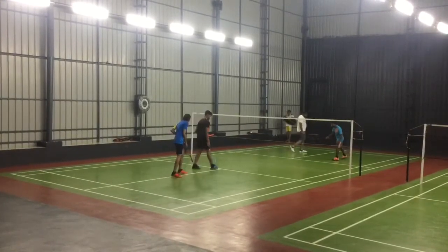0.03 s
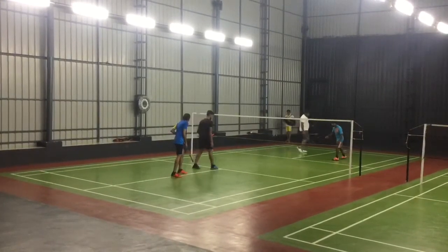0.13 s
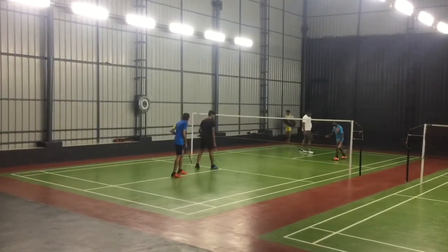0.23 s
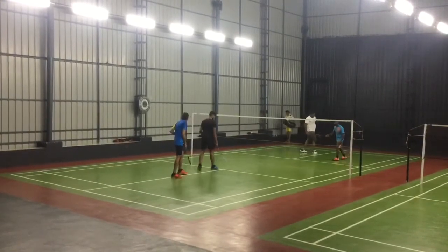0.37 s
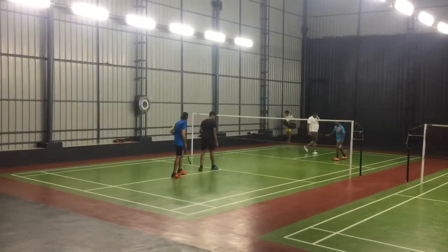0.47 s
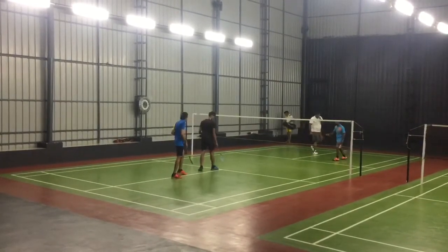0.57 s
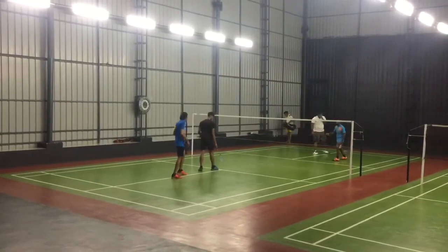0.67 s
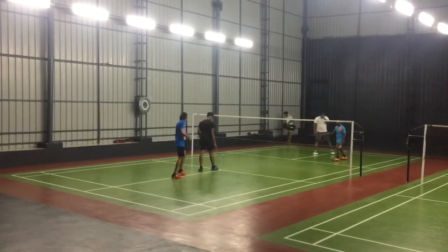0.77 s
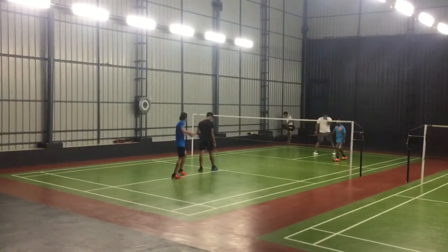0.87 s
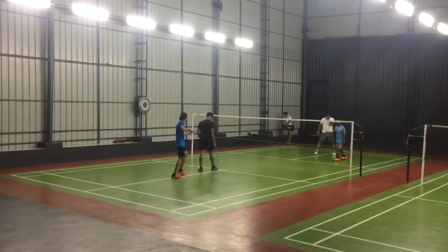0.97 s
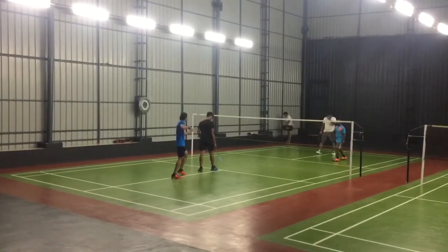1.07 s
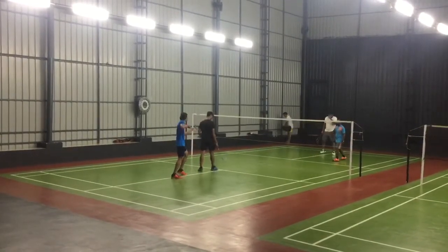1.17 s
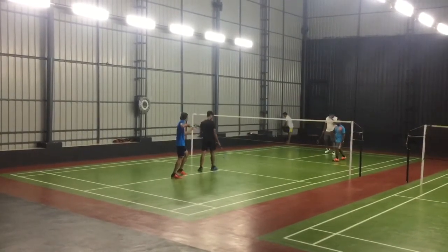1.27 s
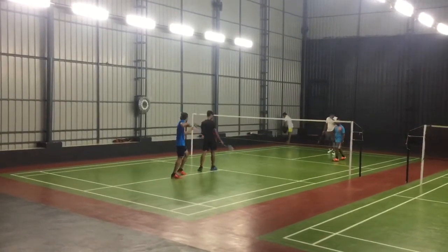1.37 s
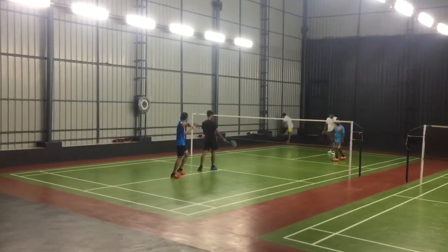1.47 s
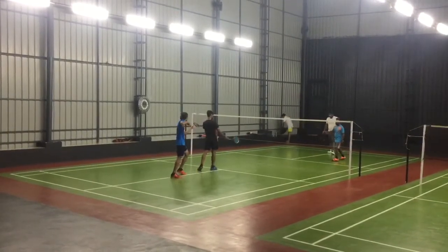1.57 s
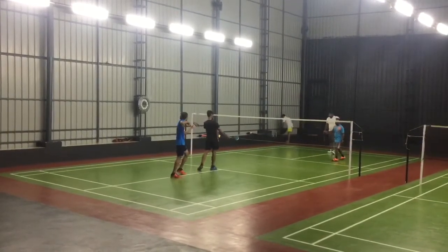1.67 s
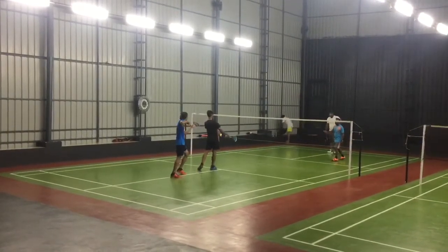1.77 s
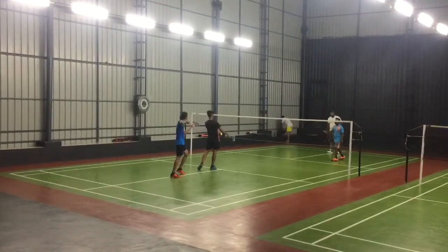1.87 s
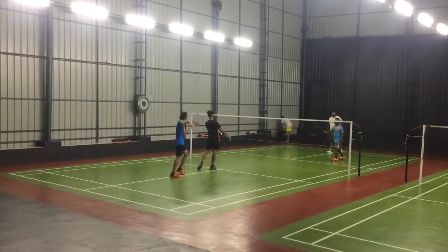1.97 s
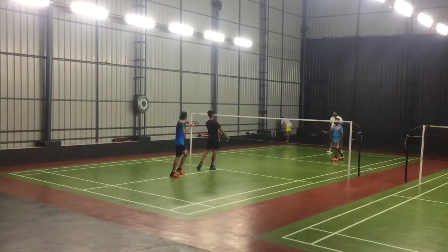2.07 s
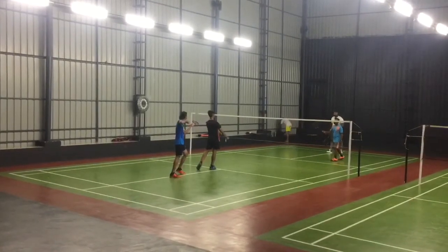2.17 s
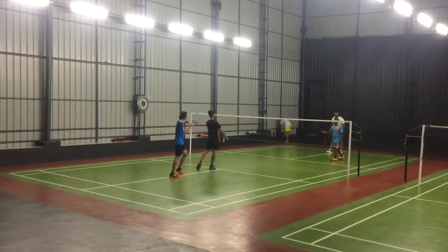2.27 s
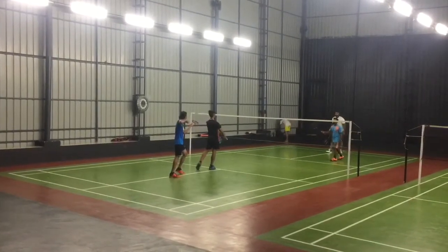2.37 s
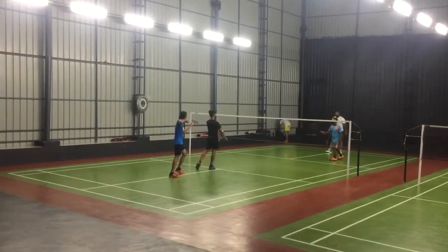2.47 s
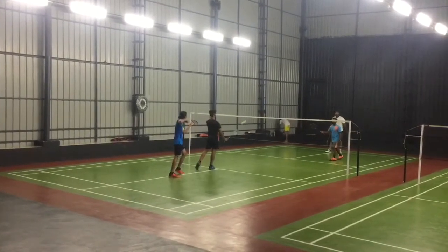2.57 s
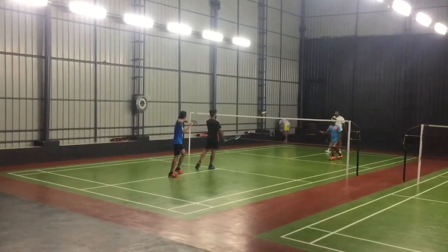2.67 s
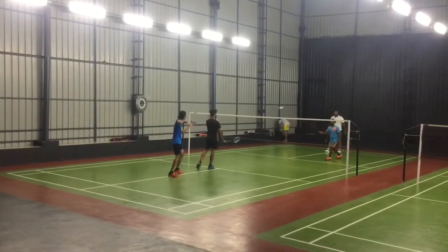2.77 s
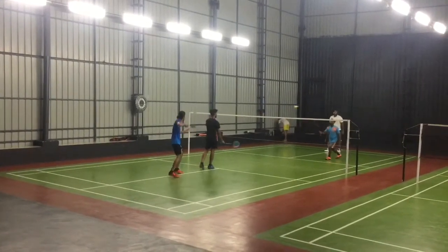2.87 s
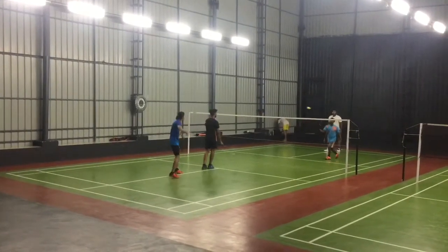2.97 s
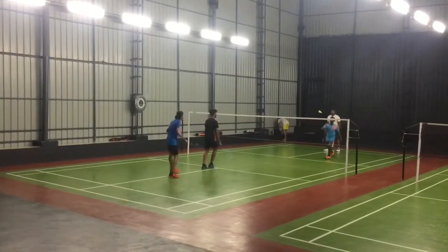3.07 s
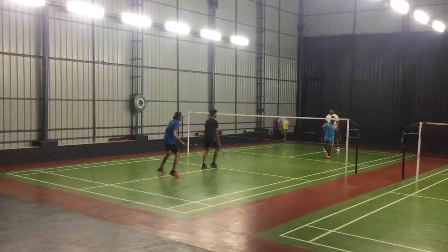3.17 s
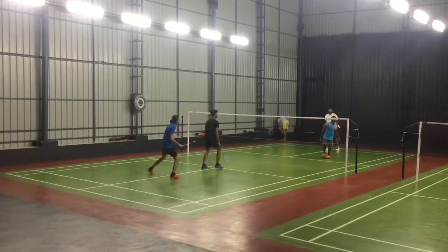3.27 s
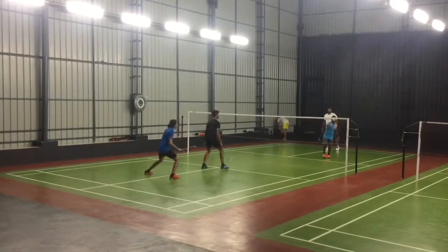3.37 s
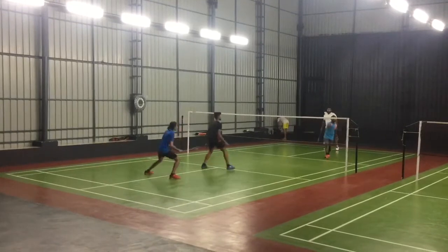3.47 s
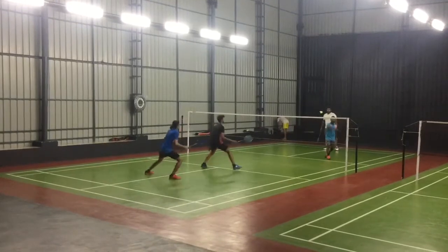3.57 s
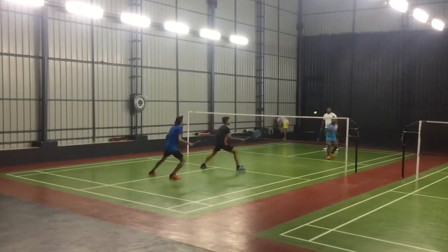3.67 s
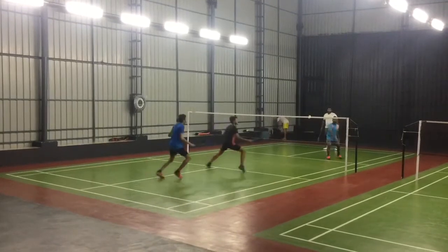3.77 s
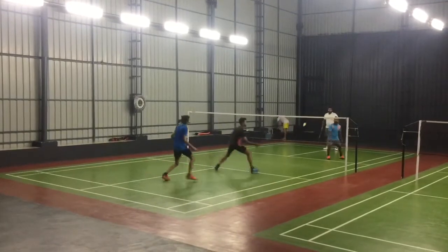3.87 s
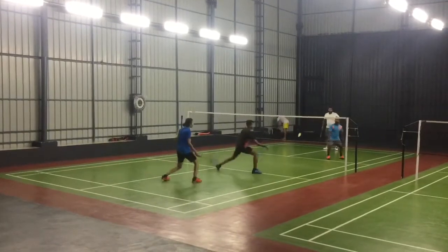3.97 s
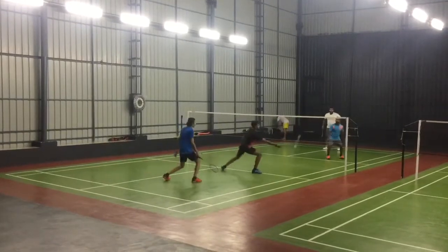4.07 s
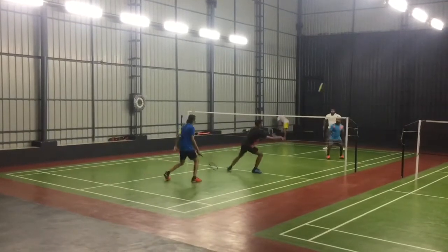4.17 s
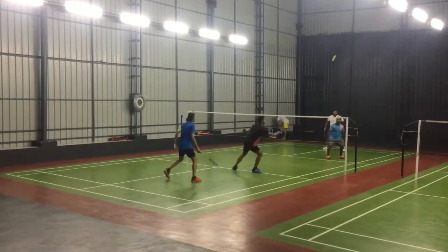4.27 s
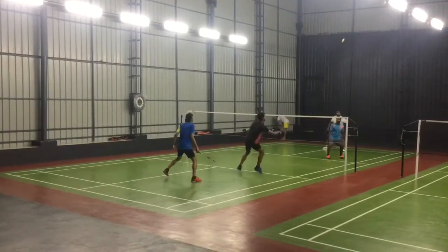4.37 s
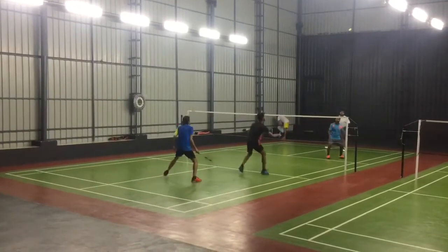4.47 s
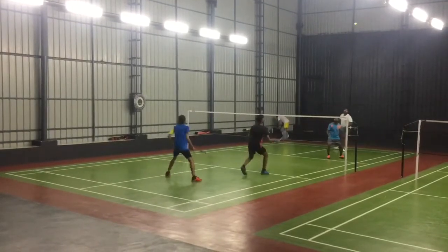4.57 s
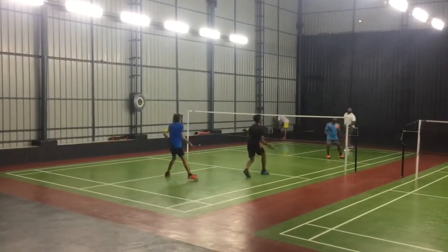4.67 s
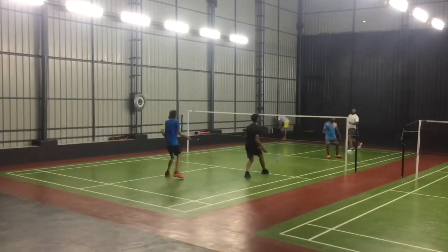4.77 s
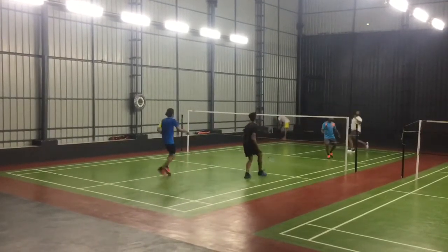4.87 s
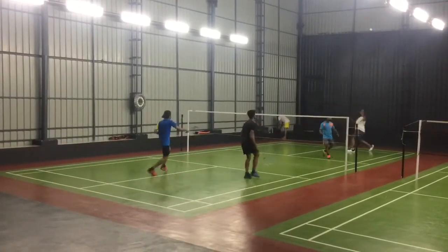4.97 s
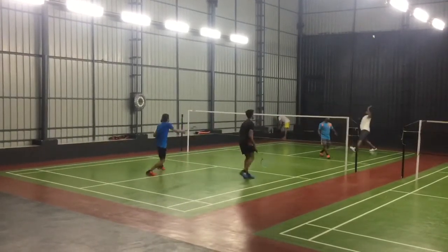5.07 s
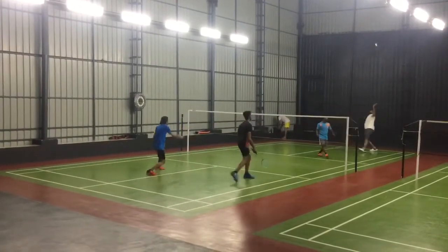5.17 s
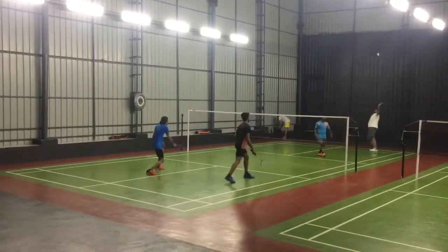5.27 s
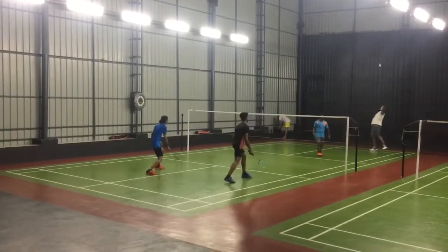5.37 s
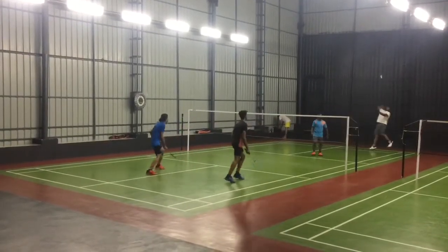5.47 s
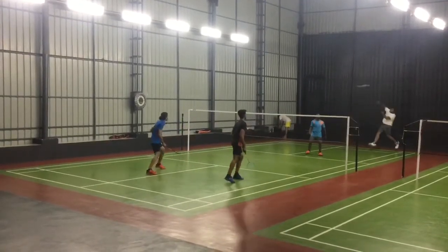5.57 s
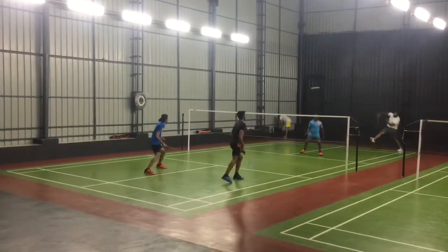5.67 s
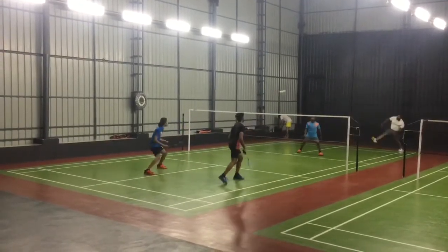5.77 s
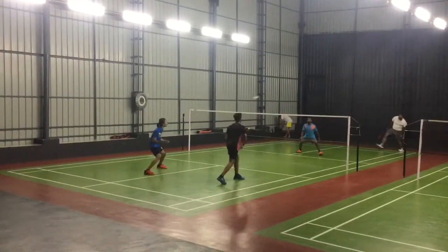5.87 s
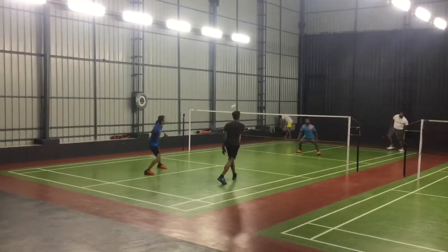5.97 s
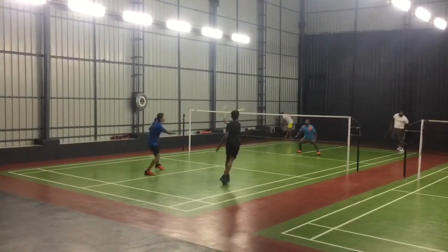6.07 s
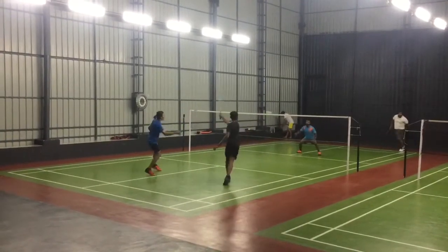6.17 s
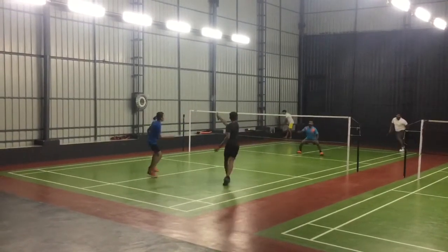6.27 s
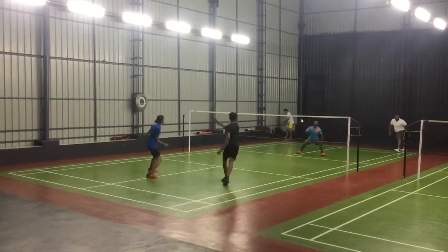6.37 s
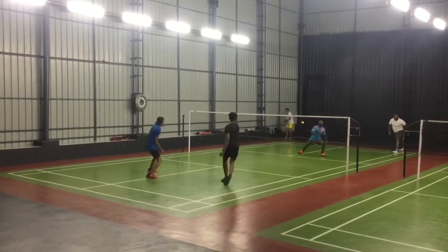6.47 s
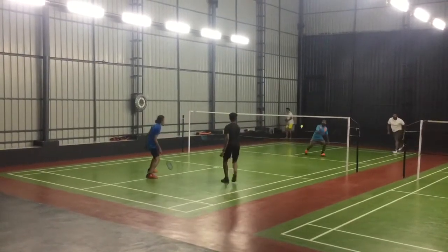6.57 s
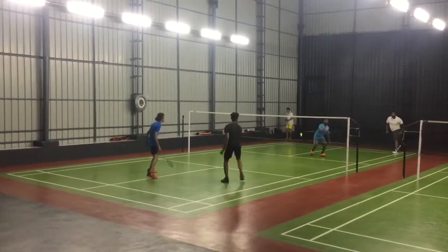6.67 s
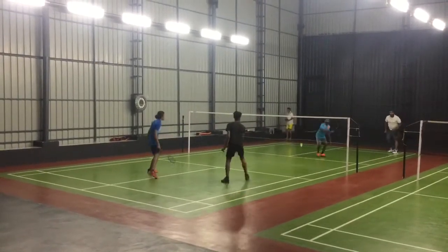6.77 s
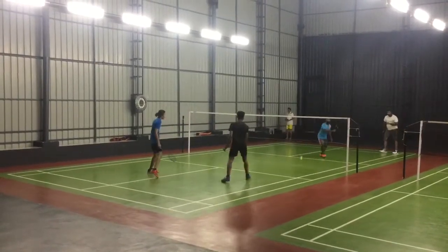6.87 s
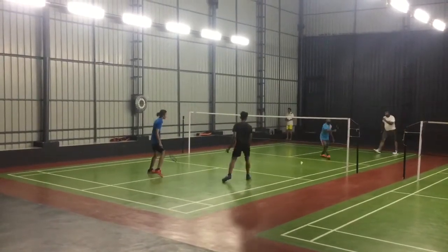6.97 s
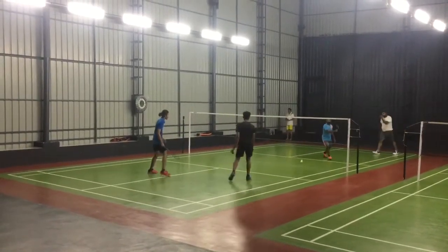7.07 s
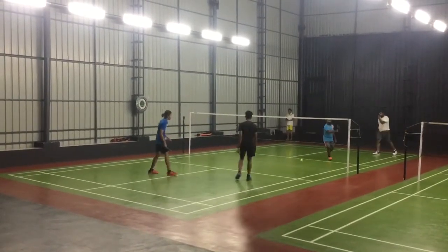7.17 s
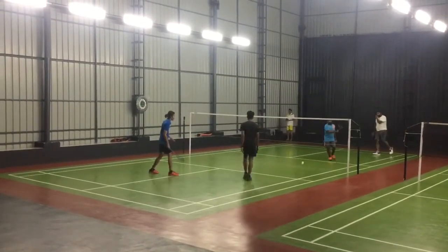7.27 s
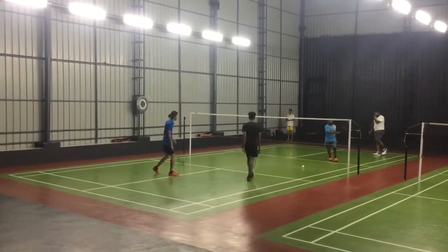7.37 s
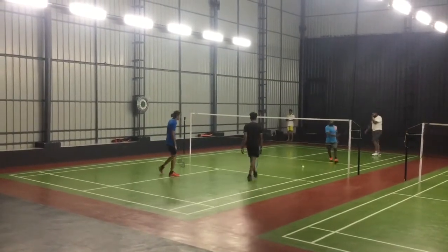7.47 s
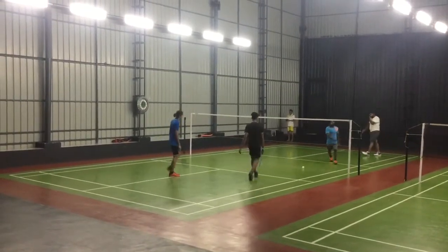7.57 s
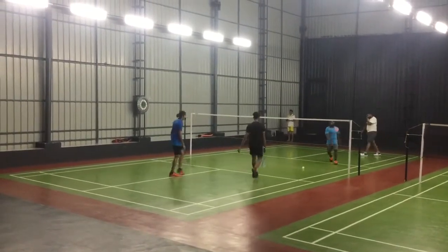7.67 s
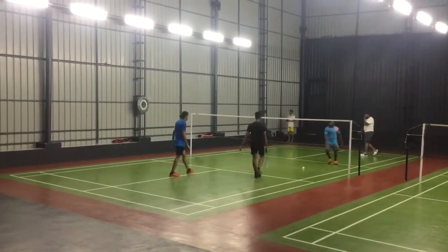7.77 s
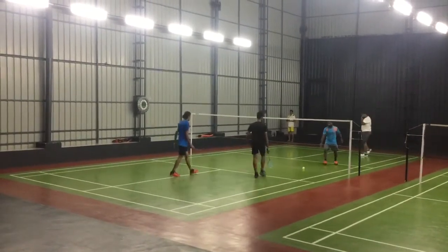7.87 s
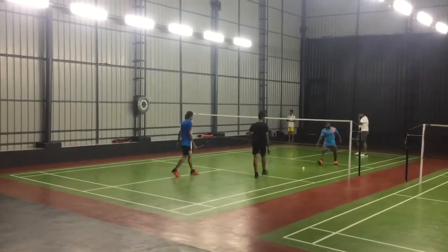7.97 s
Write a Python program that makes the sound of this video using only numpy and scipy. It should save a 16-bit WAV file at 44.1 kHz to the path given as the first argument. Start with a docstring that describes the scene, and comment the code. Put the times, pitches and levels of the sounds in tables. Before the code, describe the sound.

Distant courtside pickup of badminton, mono, with more hall than direct sound. Dull foot thuds and a chirp of rubber open over quiet hum; after a pause come a light serve tap, several woody racket knocks with a short stringy ping, squeaking soles and a heavy double stamp. Then a single explosive smash booms off metal walls, and a long reverberant tail covers two tiny late squeaks.

```python
"""Rackets strike a shuttle, rubber soles squeak and feet stamp on mats in a large metal-walled hall.
A faint hum lies beneath this badminton rally, and the hall answers each hit, squeak and step for seconds.
Hits and steps are short bursts of random pushes, and the strings add fading tones to the hits.
Squeaks are gliding tones with overtones and hiss; the hall's answer is fading noise.
An automatic level control turns loud passages down, and the highest treble is cut off."""
import sys
import numpy as np
from scipy import signal
from scipy.fft import rfft, irfft, next_fast_len
from scipy.io import wavfile
from scipy.ndimage import uniform_filter1d, map_coordinates

SR = 44100
rng = np.random.default_rng(int(sys.argv[2]) if len(sys.argv) > 2 else 0)


def transcribe(u):
    """Save the signal u as a 16-bit wav file named by the first command-line argument.

    u: samples, shape (n,) or (channels, n), limited to [-1, 1]; the rate is SR.
    q: integer samples, one column per channel.
    """
    v = np.clip(np.atleast_2d(u).T, -1, 1)
    q = np.round(v * 32767).astype(np.int16)
    wavfile.write(sys.argv[1], SR, q)


N = 354123  # length of the scene [samples]


def amp(db):
    """Turn decibels into a factor for the sound's amplitude."""
    return 10 ** (np.asarray(db) / 20)


def unit(x):
    """Scale a signal to an average (RMS) strength of 1."""
    return x / np.sqrt(np.mean(x ** 2) + 1e-20)


def unit_energy(x):
    """Scale a signal so that its squared samples add up to 1."""
    return x / np.linalg.norm(x)


def along(points, hz):
    """Read values between (frequency, value) points, spaced by the logarithm of frequency."""
    point_hz, values = np.transpose(points)
    return np.interp(np.log(hz + 1), np.log(point_hz + 1), values)


def coloured(x, spectrum, tilt_db):
    """Shape x by a spectrum tilted about 1 kHz; the minimum-phase filter never sounds early."""
    size = next_fast_len(len(x) + 8192)
    hz = np.fft.rfftfreq(size, 1 / SR)
    gain_db = along(spectrum, hz) + tilt_db * np.log2((hz + 1) / 1000)
    # folding the cepstrum (the transform of the log gain) forwards makes the filter causal
    cepstrum = irfft(np.log(amp(gain_db) + 1e-6), size)
    cepstrum[1:size // 2] *= 2
    cepstrum[size // 2 + 1:] = 0
    response = np.exp(rfft(cepstrum))
    return irfft(rfft(x, size) * response, size)[:len(x)]


def echoes(walls):
    """Make one hall answer: noise swells as reflections arrive, and each pitch dies at its own speed."""
    # fading of the hall: (frequency [Hz], time to fall by 60 dB [s])
    hall_fading = [(80, 2.6), (150, 2.97), (300, 3.7), (1000, 4.74), (3000, 4.69), (5000, 3.3),
                   (7000, 2.26), (10000, 1.42), (15000, 1.03)]
    hz, t, noise_bins = signal.stft(rng.standard_normal(4 * SR), SR, nperseg=512)
    fade = amp(-60 * t / along(hall_fading, hz)[:, None])
    tail = signal.istft(noise_bins * fade, SR, nperseg=512)[1]
    t = np.arange(len(tail)) / SR
    # floor and net posts answer first, then the nearest walls arrive together
    swell = 0.5 + 0.25 * (1 - np.exp(-(t / 0.019) ** 2))
    near_walls = 1 + walls * np.exp(-((t - 0.036) / 0.0095) ** 2)
    return unit_energy(tail * swell * near_walls)


def add(out, start_s, direct, all_round, hall_db, walls=0.15):
    """Add the sound heading for the listener and the hall's answer to what left in all directions."""
    heard = amp(hall_db) * signal.fftconvolve(all_round, echoes(walls))
    heard[:len(direct)] += direct
    part = out[round(start_s * SR):]
    part[:len(heard)] += heard[:len(part)]


def knock(spectrum, tilt_db, contact_s):
    """Make a rattling contact in one direction and the even click it averages to all round."""
    t = np.arange(SR // 3) / SR
    grip = np.exp(-(3 * t / contact_s) ** 2) * (1 - np.exp(-t / 0.0004))
    pushes = np.sign(rng.standard_normal(len(t))) * grip
    rattle = unit_energy(coloured(pushes, spectrum, tilt_db))
    click = unit_energy(coloured(t == 0, spectrum, tilt_db))
    return amp(4) * rattle, click  # the rattle carries 4 dB more energy


def hum():
    """Lamps, air and distant traffic: shaped noise whose level wanders slowly, most in the bass."""
    # colour of the hum: (frequency [Hz], level per Hz [dB])
    hum_colour = [(15, -51), (25, -19.5), (50, -4), (90, 2.5), (195, -5.5), (280, -6.5), (325, 0.5),
                  (380, -2.5), (480, -14), (600, -4.5), (754, -13.5), (1500, -15), (2280, -22),
                  (3720, -25.5), (7000, -28.5), (7700, -23.5), (8400, -31), (16000, -38)]
    # how far the noise level wanders before colouring: (frequency [Hz], RMS wander [dB])
    wander = [(40, 3), (350, 2.5), (900, 1.5)]
    hum_db = -59
    hz, _, noise_bins = signal.stft(rng.standard_normal(N), SR, nperseg=1024)
    patches = uniform_filter1d(rng.standard_normal(noise_bins.shape), size=3, axis=0)
    patches = uniform_filter1d(patches, size=12, axis=1)
    level_db = along(wander, hz)[:, None] * unit(patches)
    noise = signal.istft(noise_bins * amp(level_db), nperseg=1024)[1][:N]
    return amp(hum_db) * unit(coloured(noise, hum_colour, 0))


def feet(out):
    """Soles slap the mats: a brief contact gives a dull knock coloured by mat over concrete."""
    # feet landing: (time [s], level [dB], brightness [dB/octave], hall answer [dB])
    steps = [(0.187, -25.5, -1.5, 11), (.199, -23.5, -1.5, 9.5), (0.271, -36, 3, 11),
             (.409, -27.5, -1, 6.5), (1.48, -36.5, -3.5, 6.5), (2.13, -36, -4, 8), (3.05, -33, 1, 8),
             (3.35, -28, -1.5, 11.5), (3.679, -13, 2, 8), (3.912, -30, -5.5, 16.5), (4.027, -0.5, -1, 10),
             (4.036, -4.5, 0, 10)]
    # mat over concrete: (frequency [Hz], level per Hz [dB])
    stamp = [(35, -40), (60, -32.5), (130, -9), (300, -4.5), (480, -9.5), (700, -7), (1200, -7.5),
             (2350, -18), (4000, -23.5), (9000, -48.5), (16000, -60)]
    for start_s, db, tilt_db, hall_db in steps:
        rattle, click = knock(stamp, tilt_db, contact_s=0.012)
        add(out, start_s, amp(db) * rattle, amp(db) * click, hall_db)


def unsteadiness(u):
    """Draw a smooth random curve through about 16 steps over the length of a squeak."""
    return map_coordinates(rng.standard_normal(24), [u * 16 + 2])


def shoes_squeak(out):
    """Soles stick and slip, giving gliding, unsteady tones with overtones and rubbing hiss."""
    # squeaks: (time [s], length [s], start pitch [Hz], end pitch [Hz], level [dB],
    #           first overtone, an octave up [dB], hall answer [dB])
    squeaks = [(.439, 0.013, 3370, 2850, -40, -22.5, 11), (0.446, 0.015, 2837, 2664, -20, -18.5, 3.5),
               (2.888, 0.015, 4305, 4850, -36, -6, 10.5), (3.061, 0.012, 3705, 3210, -23.5, -10, 7),
               (3.661, 0.011, 4690, 4730, -37.5, -15, 2.5), (3.941, .038, 4950, 3754, -23.5, -7.5, 1),
               (4.037, 0.01, 4315, 4070, -12.5, -17.5, 0), (4.584, .0098, 3555, 3084, -16, -7, 2.5),
               (5.61, 0.015, 3800, 3260, -32.5, -11, 7.5), (6.156, 0.027, 3540, 3302, -33, -1, 18.5),
               (6.19, 0.023, 3620, 3568, -30, -17, 17.5)]
    # hiss of the sliding sole: (frequency [Hz], level per Hz [dB])
    rub_colour = [(500, -35.5), (2000, 3.5), (5000, 4), (12000, -10.5), (16000, -8)]
    for start_s, length_s, hz0, hz1, db, octave_db, hall_db in squeaks:
        u = np.arange(int(length_s * SR)) / (length_s * SR)  # share of the length gone by
        slips, grip = unsteadiness(u), unsteadiness(u)
        aimed_hiss_db = -5.5 + 0.44 * hall_db  # hiss towards the listener
        skid = length_s > 0.03
        if skid:  # a longer slide swells to its end, buzzier and hissier
            bend, peak = u, 0.95
            fall_db, hiss_db = -8.5, -16.5
            aimed_db = -3.5
        else:
            bend, peak = 1 - (1 - u) ** 2, 0.22  # peak: loudest point, as a share of the length
            fall_db, hiss_db = -20, -16.5 + 1.27 * octave_db
            aimed_db = aimed_hiss_db  # overtones towards the listener

        waver = 0.0071 + 0.11 * abs(hz1 / hz0 - 1)  # share of pitch, more when it glides
        pitch_hz = (hz0 + (hz1 - hz0) * bend) * (1 + waver * slips)
        phase = 2 * np.pi * np.cumsum(pitch_hz) / SR
        tone = np.sin(phase)
        overtones = 0
        for k in range(3):
            # the fall in level eases from one overtone to the next
            overtone_db = octave_db + k * fall_db + k * (k - 1) * 2
            overtones = overtones + amp(overtone_db) * np.sin((k + 2) * phase)

        rise_and_fall = np.minimum(u / peak, (1 - u) / (1 - peak))
        swell = amp(db + 1.5 * grip) * np.sin(np.pi / 2 * rise_and_fall) ** 1.5
        # a slide's hiss is full after 0.15 of its length and fades over the last tenth
        slide = amp(db) * np.minimum(1, np.minimum(u / 0.15, 10 * (1 - u)))
        rub = slide if skid else swell
        hiss = amp(hiss_db) * rub * unit(coloured(rng.standard_normal(len(u)), rub_colour, 0))
        # what the hiss averages to over all directions: a click of the same energy
        even_hiss = unit_energy(coloured(u == 0, rub_colour, 0)) * np.linalg.norm(hiss)

        direct = swell * (tone + amp(aimed_db) * overtones) + amp(aimed_hiss_db) * hiss
        all_round = swell * (tone + overtones) + even_hiss
        add(out, start_s, direct, all_round, hall_db)


def rackets(out):
    """Cork and feathers crack and the string bed rings on; tighter strings raise all its tones alike."""
    # hits: (time [s], crack level [dB], string ring base level [dB], lowest string tone [Hz],
    #        brightness [dB/octave], contact [s], hall answer [dB], near walls' extra strength [share])
    hits = [(2.629, -41, -54.5, 962, 7, 0.023, 16.5, .2), (3.425, -17, -49.5, 989, -0.5, 0.0087, 10.5, .3),
            (3.82, -13, -54, 1000, -.5, 0.0055, 8, 0.22), (4.014, -13.5, -52, 1008, 2, .008, 14, 0.17),
            (5.698, 9, -34, 1009, 0, .024, 10, 0.86)]
    # string tones: (frequency before tightening [Hz], average level over the base [dB],
    #                time to fall by 60 dB [s])
    strings = [(966, 0.5, 0.19), (1112, -11, 0.083), (1340, -18, 0.13), (1518, -12, 0.14),
               (1918, -15, 0.086), (1990, -22, 0.069)]
    # cork and feathers: (frequency [Hz], level per Hz [dB])
    crack = [(35, -30), (60, -20), (150, -12), (305, -3), (500, -4), (620, -1), (780, -9.5), (1150, -2.5),
             (1800, -9), (3340, -11.5), (4850, -18.5), (5840, -13.5), (9000, -24.5), (15500, -30.5)]
    t = np.arange(SR // 3) / SR
    for start_s, db, ring_db, low_hz, tilt_db, contact_s, hall_db, walls in hits:
        rattle, click = knock(crack, tilt_db, contact_s)
        tightness = low_hz / strings[0][0]
        ring = 0
        for hz, level_db, fade_s in strings:
            tone_db = ring_db + level_db + rng.normal(0, 3.4)  # each hit excites the tones differently
            ring = ring + amp(tone_db - 60 * t / fade_s) * np.sin(2 * np.pi * hz * tightness * t)
        add(out, start_s, amp(db) * rattle + ring, amp(db) * click + ring, hall_db, walls)


def scene():
    """Lay the squeaks, hits and steps over the hum."""
    out = hum()
    for add_source in (shoes_squeak, rackets, feet):
        add_source(out)
    return out[None]


def record(dry):
    """Turn the level down as recent power passes a knee, then cut off the highest treble."""
    memory_s, knee_db = 0.06, -25
    top_hz, edge_hz = 15750, 150  # middle and width of the treble cut-off
    keep = np.exp(-1 / (memory_s * SR))
    power = signal.lfilter([1 - keep], [1, -keep], dry ** 2)
    level = dry * (1 + power / amp(knee_db) ** 2) ** -0.2
    size = next_fast_len(N + 4096)
    hz = np.fft.rfftfreq(size, 1 / SR)
    edge = np.clip((top_hz - hz) / edge_hz + 0.5, 0, 1) ** 2
    return irfft(rfft(level, size) * edge, size)[..., :N]


dry = scene()
out = record(dry)
transcribe(out)
```